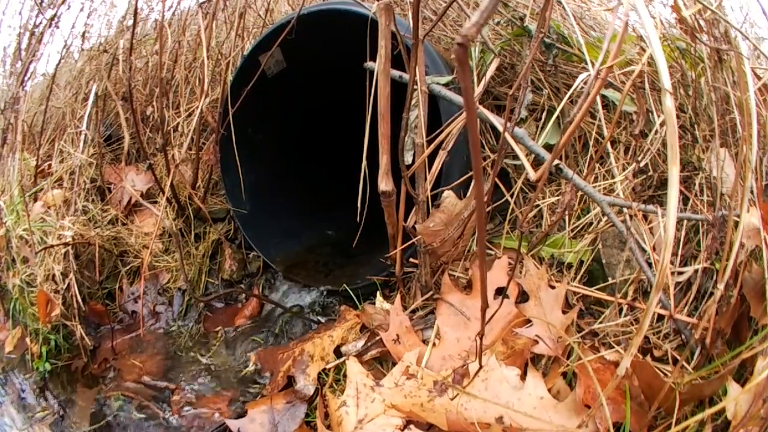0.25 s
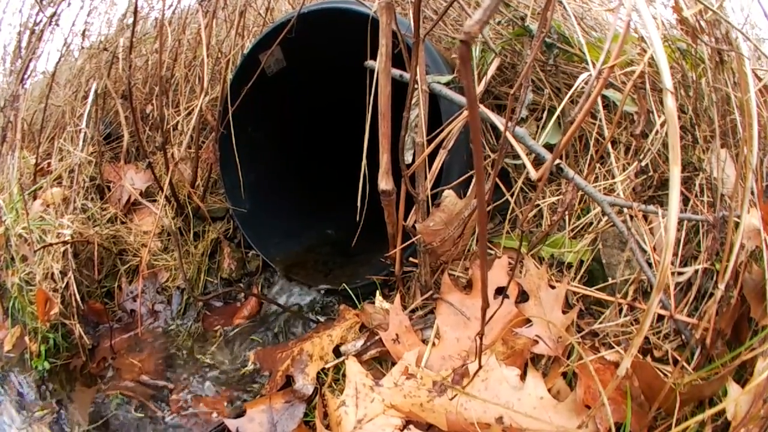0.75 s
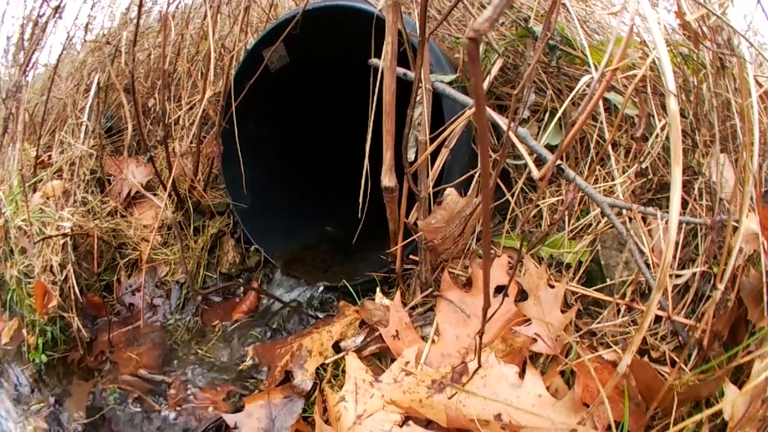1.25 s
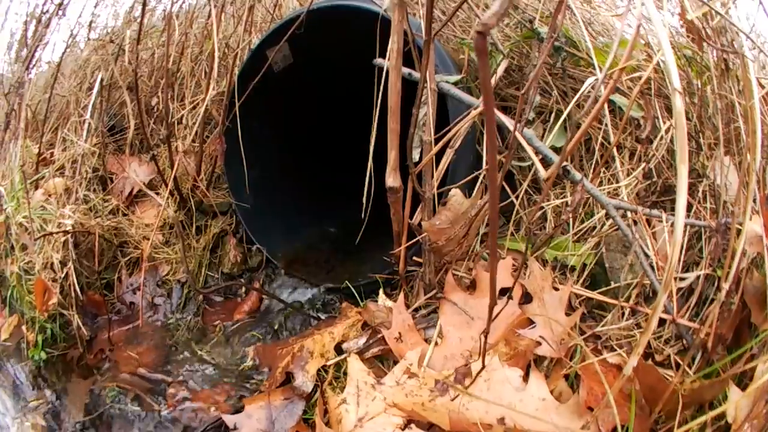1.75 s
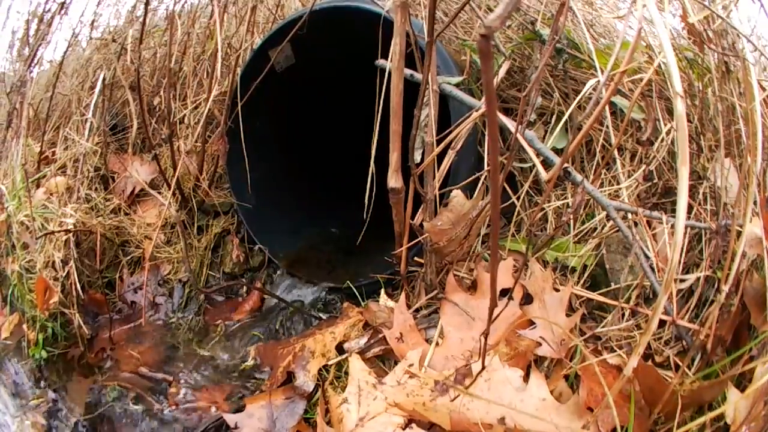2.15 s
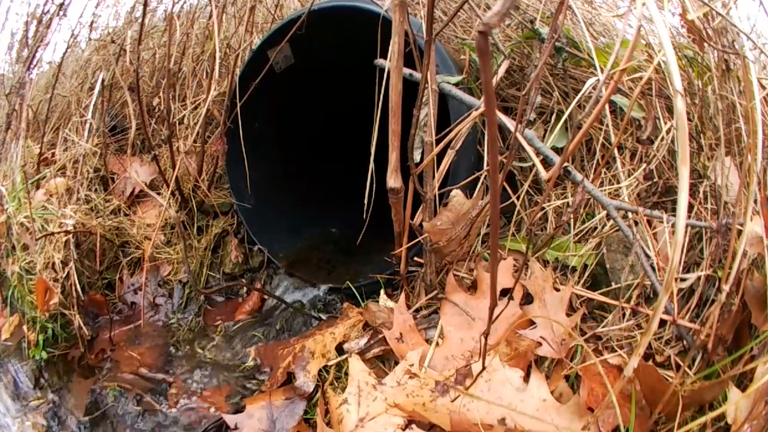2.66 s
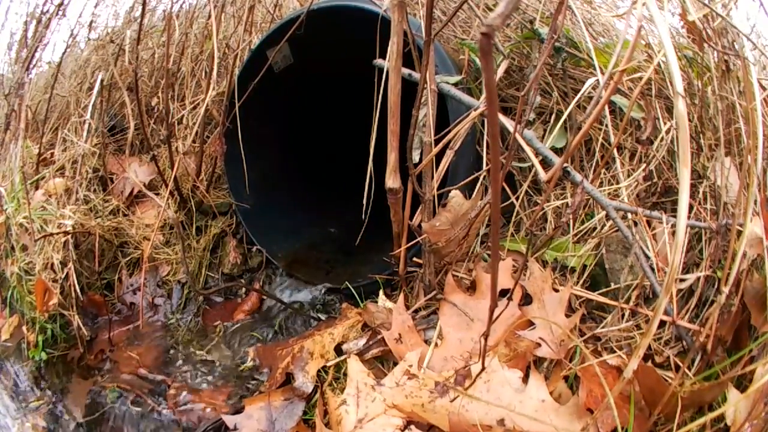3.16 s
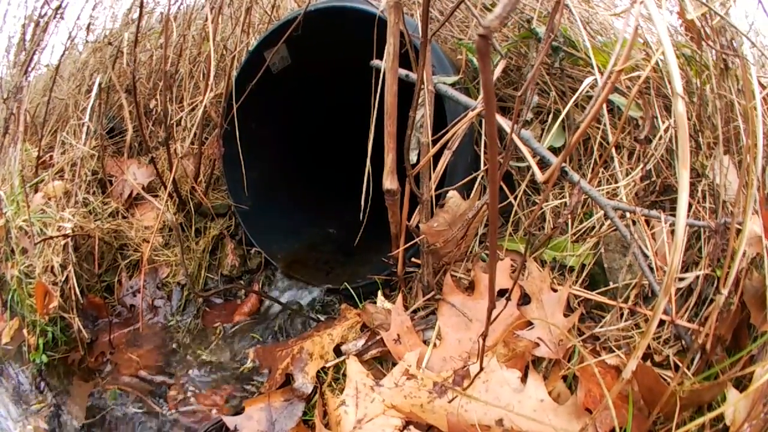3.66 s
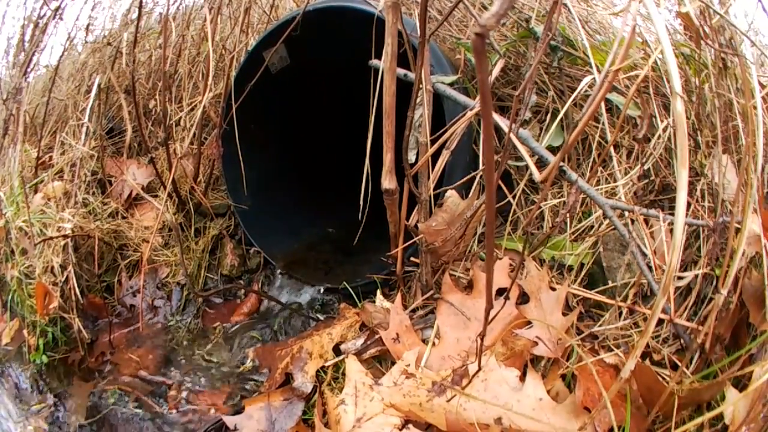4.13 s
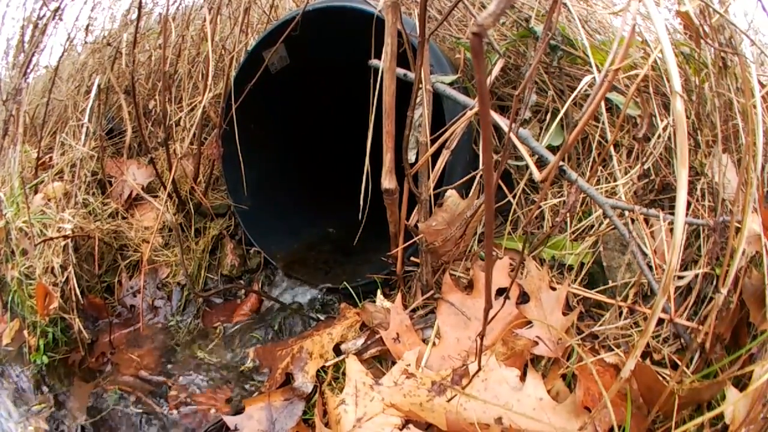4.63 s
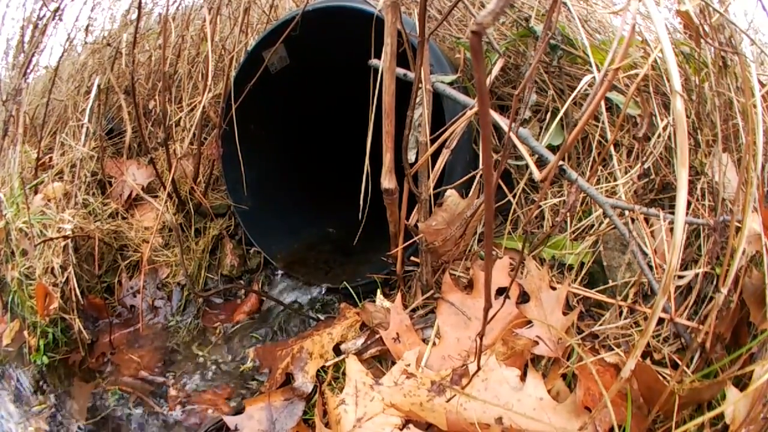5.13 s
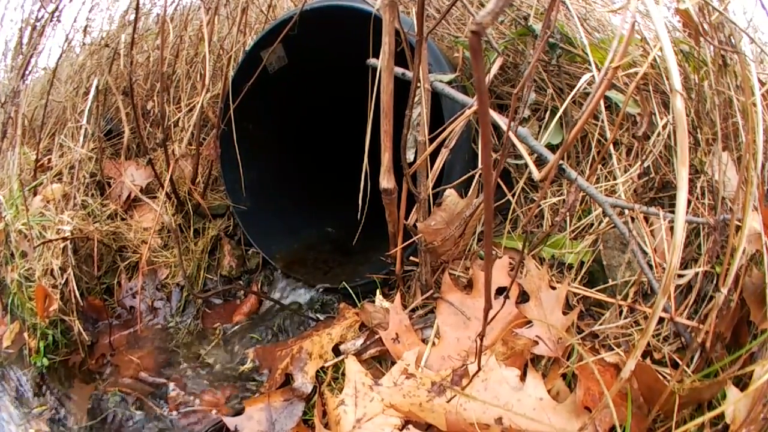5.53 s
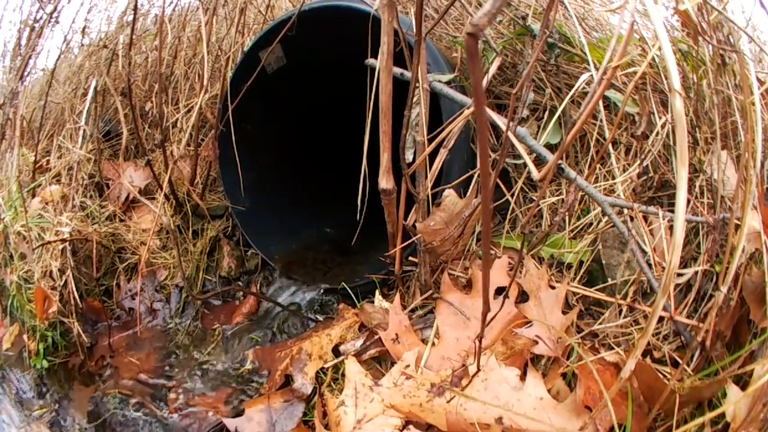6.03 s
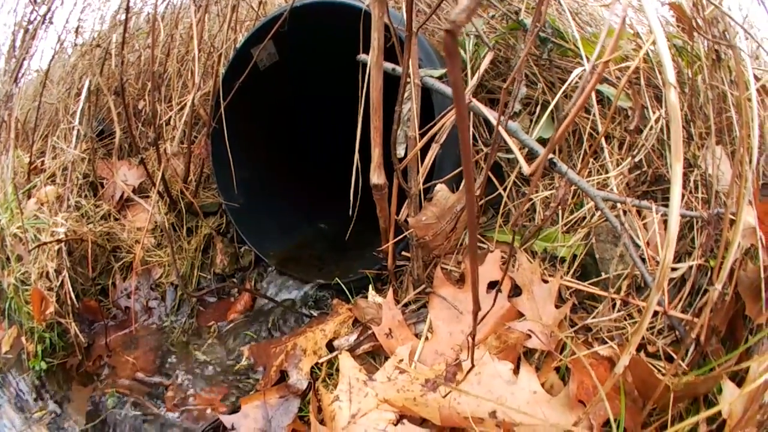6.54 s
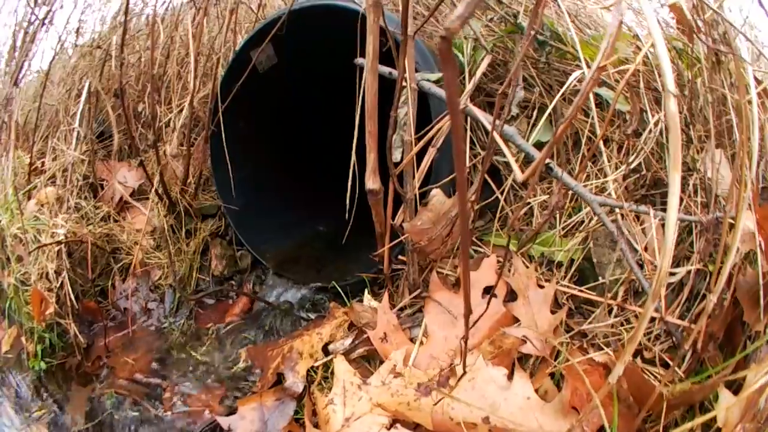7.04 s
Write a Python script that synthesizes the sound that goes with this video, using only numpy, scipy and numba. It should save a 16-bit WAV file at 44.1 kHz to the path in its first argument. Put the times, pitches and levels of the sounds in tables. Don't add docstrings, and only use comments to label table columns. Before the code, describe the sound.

Close, bright water dribbles and gurgles over wet leaves, crisp with tiny bubble pops and spray ticks, leaning left, with a barely audible road rumble.

```python
import sys
import numpy as np
from scipy import signal
from scipy.fft import rfft, irfft, next_fast_len
from scipy.io import wavfile
from scipy.ndimage import uniform_filter1d, map_coordinates
from numba import njit

SR = 44100
rng = np.random.default_rng(int(sys.argv[2]) if len(sys.argv) > 2 else 0)


def log_audio(samples):
    frames = np.atleast_2d(samples).T
    limited = np.clip(frames, -1, 1)
    pcm = np.round(limited * 32767).astype(np.int16)
    wavfile.write(sys.argv[1], SR, pcm)


def undo_db(level):
    steps = np.asarray(level, float) / 20
    return 10 ** steps


N = 321489

# time_s, level_db
FLOW = [
    (0, -46.5),
    (3.6, -46.5),
    (7.29, -45.5),
]
# frequency_hz, density_db
WASH_SPECTRUM = [(300, -45), (480, -80), (720, 9.5), (1240, -5.5), (2500, 2), (4800, 1.5), (6200, 0),
                 (8000, -7.5), (11000, -8), (16000, -3.5)]
# centre_hz, width_hz, depth_db
ECHO_DIPS = [(713, 47, 14), (1950, 79, 12), (2310, 410, 6.5), (3063, 113, 12.5), (3966, 190, 9),
             (5690, 200, 1), (8860, 230, 5.5)]
# low_hz, high_hz, gain_db
THIN_BAND = (7520, 8000, -10)
# frequency_hz, density_db
RUMBLE_SPECTRUM = [(22, -36), (40, -24), (75, 0.5), (110, 5), (170, 3.5), (255, -4.5), (310, -16.5),
                   (450, -19), (620, -8), (800, -15)]
# time_s, rumble_db, tyres_db
ROAD = [(0, -62, -68.5), (.7, -61, -70.5), (1.7, -59, -67.5), (2.6, -63, -70.5), (3.3, -59.5, -72),
        (4, -65.5, -71.5), (4.6, -60.5, -80), (5.4, -63.5, -84), (6, -63.5, -73.5), (6.9, -62, -81),
        (7.29, -62.5, -98)]
# time_s, pitch_hz, level_db
ENGINE = [(0.25, 124, -85), (.35, 126.7, -68), (.55, 127.7, -72), (.84, 129.1, -58), (1.12, 132.2, -64),
          (1.3, 133.2, -72), (1.5, 135, -62), (1.9, 134, -82), (2.12, 137.1, -66), (2.45, 137.9, -64.5),
          (2.9, 141.5, -83)]
# frequency_hz, difference_db
LEFT_LEAN = [(60, 9), (200, 9.3), (380, 5.7), (700, 9.2), (2400, 10.5), (8000, 13.2), (15000, 15.3)]
# frequency_hz, level_db
RIGHT_SHARE = [(40, -6), (130, -17), (300, -5), (640, -13), (3100, -22), (15000, -31)]
# frequency_hz, density_db
TYRE_SPECTRUM = [(120, -17), (200, -3), (290, -6.5), (330, -11.5), (480, -16), (700, -59)]
# frequency_hz, density_db
SPRAY_SPECTRUM = [(1500, -8), (3000, -0.5), (6000, 14), (9000, -5.5), (16500, -5.5)]
# frequency_hz, density_db
MIST_SPECTRUM = [(5000, -24), (8000, 1), (11000, -3), (16500, -1)]

# start_s, level_db, pitch_hz
GLUGS = [(0.041, -36, 940), (0.134, -35.5, 940), (0.205, -40, 1166), (0.235, -38, 799),
         (0.453, -37.5, 1209), (0.524, -36.5, 1167), (0.96, -41, 1300), (1.097, -39, 963),
         (1.304, -37.5, 1145), (1.495, -38, 1053), (1.547, -42, 866), (1.679, -37.5, 1190),
         (2.408, -39, 1210), (2.486, -43.5, 819), (2.754, -34.5, 1060), (3.249, -39, 770),
         (3.923, -33.5, 923), (4.028, -38.5, 759.4), (4.45, -38, 1225), (4.467, -37.5, 1062),
         (4.539, -38.5, 1297), (4.568, -39, 997), (4.716, -44.5, 821), (5.241, -41, 1095),
         (5.946, -40, 1097), (6.258, -39.5, 987), (6.407, -38, 1006), (6.598, -39, 1070),
         (6.641, -34, 1053), (7.186, -31.5, 1000)]
BLOOPS = [(0.1008, -33, 1314), (0.799, -39, 1315), (1.1468, -36, 1373), (1.365, -35.5, 1434),
          (1.711, -32.5, 1181), (1.82, -34, 1247), (2.9682, -30, 1300), (3.473, -35.5, 1440),
          (3.6575, -38.5, 1485), (3.6791, -36, 1224), (3.7826, -32, 1470), (3.8601, -35, 1300),
          (4.229, -41, 1171), (4.2693, -33.5, 1483), (4.499, -41, 1336), (5.0346, -35.5, 1345),
          (5.2799, -40.5, 1146), (5.3348, -39, 1488), (5.575, -35.5, 1170), (5.752, -33, 1500),
          (5.783, -35, 1300), (6.2069, -35, 1495), (6.4755, -33, 1516), (6.5228, -35, 1415),
          (6.8465, -28.5, 1197), (6.9556, -38, 1350), (7.0256, -32, 1377)]
PLOPS = [(0.0296, -37.5, 1823), (0.343, -33, 2044), (0.388, -34.5, 1716), (0.891, -34.5, 1768),
         (1.079, -37, 1790), (1.2007, -34, 1750), (1.3441, -32.5, 1830), (1.8274, -36, 1732),
         (2.1862, -37.5, 1700), (2.3238, -37, 1695), (2.497, -39, 1785), (2.503, -32, 1770),
         (2.518, -31.5, 1950), (3.1011, -35, 1670), (3.2258, -37, 1730), (3.8455, -31.5, 1870),
         (4.0619, -37, 1760), (4.134, -33, 1670), (5.0393, -32, 1670), (5.288, -37.5, 1760),
         (5.3371, -33, 1830), (5.6453, -39.5, 1667), (5.8366, -33.5, 1745), (6.0837, -27, 1768),
         (6.1473, -33.5, 1778), (6.2416, -35, 1840), (6.2535, -31.5, 1670), (6.3681, -27, 1840),
         (6.8459, -34.5, 1829)]
PLINKS = [(0.213, -38, 2290), (0.377, -40, 2200), (0.477, -36, 1987), (0.6329, -35, 5810),
          (0.6359, -35, 7200), (0.663, -41, 7210), (1.971, -36, 2650), (2.007, -32, 2960),
          (2.048, -33, 3390), (2.0695, -34, 2700), (2.1, -39, 3495), (0.8285, -23, 2725),
          (0.891, -31, 2607), (0.989, -26.5, 2637), (1.037, -24, 2740), (1.067, -27, 3565),
          (2.322, -27, 3395), (2.5326, -28, 3460), (2.9474, -24, 3400), (3.134, -25, 3572),
          (3.4833, -25.5, 2956), (3.5565, -29.5, 2299), (3.7454, -23.5, 3217), (4.5455, -26, 2802),
          (4.5565, -27, 3426), (4.5731, -22, 3300), (4.6731, -27.5, 2760), (4.7173, -29.5, 3350),
          (4.978, -26.5, 3379), (5.004, -30, 2543), (5.0402, -26, 3320), (5.166, -22, 3863),
          (5.3573, -24.5, 2968), (5.4029, -27, 2750), (5.4914, -32.5, 2670), (5.7113, -27, 3112),
          (6.2481, -26, 2363), (6.473, -25, 2740), (6.5208, -24, 3470)]
TICKS = [(0.0347, -21, 4730), (0.495, -25.5, 5053), (0.5488, -27.5, 4780), (0.6861, -23.5, 4330),
         (0.7067, -24.5, 4631), (1.3095, -25.5, 4903), (1.374, -26, 4222), (1.956, -20.5, 4787),
         (2.0385, -25.5, 4643), (2.385, -31, 5027), (2.6709, -30, 4023), (2.97, -27, 4662),
         (3.0963, -24, 4340), (3.272, -24.5, 4840), (3.7526, -27.5, 4940), (3.9762, -26, 4900),
         (4.1342, -28, 4280), (4.482, -32, 4196), (4.7592, -26, 5160), (4.811, -25.5, 5194),
         (4.9254, -25, 4160), (5.039, -27, 4774), (5.26, -31, 4338), (5.473, -22.5, 4680),
         (6.299, -20.5, 4930), (6.53, -26, 4154), (6.6498, -26, 4920), (6.87, -26.5, 5000),
         (7.139, -26, 4700)]
PIPS = [(0.4613, -25, 6260), (1.123, -24.5, 6660), (1.2854, -25.5, 5898), (1.356, -27, 5690),
        (1.5214, -30.5, 6300), (1.6196, -26, 5970), (2.0338, -24.5, 6937), (2.052, -32, 5893),
        (2.355, -27.5, 7040), (2.4196, -28, 6793), (2.6504, -28.5, 6100), (2.687, -25, 7328),
        (2.995, -26.5, 5700), (3.5539, -43, 6103), (3.7557, -26, 6186), (3.9792, -21, 5600),
        (4.372, -29.5, 6100), (4.672, -21.5, 6850), (5.7285, -27, 5987), (5.781, -23, 6460),
        (5.8904, -26, 7013), (5.996, -27.5, 5850), (6.1085, -27, 6137), (6.2164, -32, 5793),
        (6.6147, -25.5, 6260), (6.9697, -29, 6360), (7.1589, -27.5, 7000), (7.255, -20.5, 6800)]
SPITS = [(0.5915, -31, 10520), (0.654, -16, 14000), (0.6853, -28, 10720), (0.8672, -17.5, 13080),
         (1.0987, -22, 13800), (1.5482, -37, 11710), (1.5793, -22, 11800), (1.9021, -27, 14350),
         (2.418, -21.5, 15240), (2.4582, -22.5, 9670), (2.688, -20, 12620), (3.034, -22.5, 13000),
         (3.19, -31, 9856), (3.539, -20, 10870), (4.3319, -24, 9730), (4.356, -19, 14400),
         (4.4119, -24.5, 10780), (4.6183, -22, 12200), (4.836, -22, 12120), (4.847, -27, 15100),
         (5.689, -24, 9456), (6.2208, -27, 13890), (6.2974, -22, 12600), (6.4077, -24.5, 9240),
         (6.427, -28, 10160), (6.465, -24, 14900), (7.036, -27, 10010), (7.06, -16, 10390),
         (7.1557, -29.5, 9740)]
# start_s, level_db, pitch_hz
POPS = [(0.1757, -26.5, 4260), (0.427, -25, 4740), (0.771, -20, 5000), (1.6372, -27, 3252),
        (1.702, -21, 5430), (1.7485, -24, 3300), (1.7582, -30, 4740), (2.2944, -29, 5533),
        (2.602, -23, 2400), (2.7316, -20, 5025), (2.8745, -22.5, 2900), (3.1746, -23, 2680),
        (3.2233, -26, 5426), (3.5734, -20, 6120), (3.6928, -26.5, 2830), (3.7167, -26, 4870),
        (3.99, -25.5, 2963), (4.0236, -24, 4870), (4.132, -22.5, 4248), (4.4029, -26.5, 5960),
        (4.8783, -27, 5900), (5.0313, -24, 2720), (5.4209, -20, 6060), (5.6447, -24, 3335),
        (5.8377, -27, 4520), (6.1803, -25, 3597), (6.9292, -24, 3885), (6.9664, -23, 2648)]
# start_s, level_db, pitch_hz
BURBLES = [(0.0732, -41, 1330), (0.1095, -45, 1740), (0.1828, -41.5, 1010), (0.2606, -40.5, 1830),
           (0.6637, -44, 1830), (0.703, -40, 1778), (0.7427, -39, 1130), (0.888, -34, 2210),
           (0.9702, -36.5, 1300), (1.1088, -39, 1680), (1.167, -45, 1205), (1.2164, -43, 1075),
           (1.2845, -41, 1350), (1.413, -36.5, 1831), (1.6784, -41, 1639), (2.0021, -39, 1620),
           (2.1589, -39, 1747), (2.2255, -40, 1369), (2.5345, -38, 1437), (2.6387, -38, 2050),
           (2.6958, -41, 1508), (3.2546, -40, 1462), (3.5385, -47, 1250), (3.6158, -36, 1990),
           (3.6934, -43, 1430), (3.8244, -35, 1770), (3.925, -43, 1455), (4.1144, -36.5, 1499),
           (4.1332, -40.5, 1154), (4.3317, -42.5, 1451), (4.3673, -35, 2080), (4.5691, -41, 1400),
           (4.5843, -41, 1690), (4.9215, -47, 1290.0), (4.9627, -42, 1880), (4.9959, -41, 1125),
           (5.032, -45, 870), (5.1916, -40.5, 1504), (5.2966, -40.5, 1414), (5.3536, -37, 2110.0),
           (5.375, -40, 1770), (5.5784, -44, 1660), (5.713, -42.5, 949), (5.7157, -37, 1570),
           (5.7972, -39, 1220), (6.0109, -41, 1348), (6.104, -31, 2110.0), (6.2205, -45, 1389),
           (6.629, -42, 1370), (6.722, -41, 1100), (6.7693, -43, 1820), (6.8926, -42, 1690),
           (7.1474, -41, 1474), (7.1597, -43, 1393), (7.2117, -32, 1900)]
# start_s, level_db, pitch_hz
TINKLES = [(0.0713, -26, 4700), (0.2016, -29.5, 4745), (0.398, -34, 3377), (0.4233, -31.5, 3800),
           (0.5517, -27.5, 2570), (0.739, -29, 4870.0), (0.7743, -29, 5230), (0.846, -29.5, 4830),
           (1.0032, -25.5, 4803), (1.2497, -29, 5295), (1.638, -32, 4977), (1.75, -31, 4993),
           (2.0449, -32, 4940), (2.1223, -31.5, 3500), (2.1427, -32.5, 3750), (2.6087, -37, 2641),
           (2.6338, -32, 2709), (2.6386, -32, 6720.0), (2.801, -32, 3410), (3.1744, -33, 5567),
           (3.2226, -31, 3440), (3.2316, -29.5, 4935), (3.3466, -30, 2753), (3.4911, -37, 5164),
           (3.506, -33, 4522), (3.5399, -25.5, 7130), (3.7133, -32, 3300), (3.7578, -31, 5004),
           (3.9399, -30.5, 5475), (3.9897, -29, 4944), (4.171, -25.5, 3331), (4.7191, -36, 4750),
           (4.793, -27.5, 3823), (4.8613, -25.5, 3121), (4.9177, -31, 4900), (5.031, -33, 4843),
           (5.1227, -29, 5030), (5.1859, -31, 2877), (5.2395, -30, 5137), (5.3334, -30, 5310),
           (5.4993, -26.5, 4915), (5.6928, -28, 3390), (5.7128, -31, 4910), (5.83, -28.5, 3265),
           (6.1813, -34, 6420.0), (6.2487, -29, 6030.0), (6.455, -30, 2660), (6.5651, -29.5, 4217),
           (6.6203, -33, 3364), (6.694, -32, 2668), (7.0598, -27.5, 3074), (0.0103, -30, 4800),
           (0.051, -28, 3065), (1.961, -29, 4400), (2.575, -34, 2755), (2.6258, -27, 5340),
           (3.8603, -31.5, 3840), (3.957, -34, 3102), (4.638, -29, 4980), (5.358, -23.5, 3900),
           (5.88, -37, 2897)]
# start_s, level_db, pitch_hz
FLICKS = [(0.3222, -29, 9890), (0.639, -23, 12190), (0.6925, -24, 14380.0), (0.9913, -26, 11220),
          (1.0389, -26, 9690.0), (1.0621, -29, 11440), (1.123, -29, 14940.0), (1.29, -30, 9726),
          (1.4616, -30, 8356), (1.5473, -27, 13690), (1.8834, -27, 10000), (2.0952, -37, 15070.0),
          (2.4435, -26, 14130.0), (2.693, -27, 11560), (2.97, -29, 13490), (3.0094, -32, 8195),
          (3.196, -34.5, 9693), (3.483, -25.5, 9430.0), (3.58, -19.5, 8000), (3.678, -28, 9295),
          (4.3234, -39, 9550), (4.6764, -33, 12180), (4.8308, -29, 9296), (5.005, -27.5, 9200),
          (5.1071, -27, 9315), (5.171, -30, 9390), (5.2294, -28, 9530), (5.8792, -36.0, 15470),
          (5.8894, -22, 10160.0), (6.2957, -25, 15200.0), (6.6943, -32, 8350), (6.7607, -31, 8176),
          (7.0282, -22, 11260), (7.0706, -25, 10900), (7.1544, -24, 14600.0)]
# start_s, level_db, pitch_hz
GULPS = [
    (1.635, -46, 440),
    (1.735, -45, 396.7),
]
# start_s, level_db, first_pitch_hz
SWEEPS = [
    (0.949, -33, 2400),
    (1.0127, -31, 2794),
    (1.933, -30, 1630),
    (3.699, -40, 2610),
    (6.601, -27.5, 3670),
]
# pitch_hz, cycles_to_fade
RING_CYCLES = [(400, 6.8), (900, 13), (1250, 19), (1750, 27.2), (3000, 15.3), (5000, 21.3), (12000, 9.8)]

POP_CYCLES, SWELL_S = 5, 0.00007
SPECK_HZ = 8000
TOP_HZ = 16120


def unit(x):
    return x / np.sqrt(np.mean(x ** 2) + 1e-20)


def along(points, hz):
    f, v = np.transpose(points)
    return np.interp(np.log(hz + 1), np.log(f + 1), v)


def curves(rows):
    s, *cols = np.transpose(rows)
    return [np.interp(np.arange(N) / SR, s, c) for c in cols]


def wobble(rate):
    knots = rng.standard_normal(int(N * rate / SR) + 4)
    return map_coordinates(knots, [np.arange(N) * rate / SR])


def filtered(x, response):
    m = next_fast_len(N + 8192)
    return irfft(rfft(x, m) * response(np.fft.rfftfreq(m, 1 / SR)), m)[..., :N]


def noise(spectrum, patchy_db=0):
    z = signal.stft(rng.standard_normal(N + 2048), nperseg=2048)[2]
    field = uniform_filter1d(rng.standard_normal(z.shape), size=3, axis=0)
    field = uniform_filter1d(field, size=9, axis=1)
    patchy = signal.istft(z * undo_db(patchy_db * unit(field)), nperseg=2048)[1][:N]
    return unit(filtered(patchy, lambda hz: undo_db(along(spectrum, hz))))


@njit
def add(out, s, gain, hz, cycles, rise, attack, hold, sr):
    for i in range(len(s)):
        start, life = int(s[i] * sr), cycles[i] / hz[i]
        for k in range(min(int(2 * life * sr), len(out) - start)):
            t = k / sr
            climb = rise[i] * t * t / (life * life)
            turns = hz[i] * t * (1 + climb / 3)
            if hz[i] * (1 + climb) < sr / 2:
                fade = np.exp(-3 * (t / life) ** hold[i])
                swell = 1 - np.exp(-t * hz[i] / attack[i])
                out[start + k] += gain[i] * np.sin(2 * np.pi * turns) * fade * swell


def ring(s, db, hz, cycles, rise, attack, hold):
    out, luck = np.zeros(N), rng.standard_normal((len(s), 4))
    cycles = cycles * np.exp(0.27 * luck[:, 0])
    glide = rise * (1 + 1.19 * luck[:, 1])
    attack = attack * np.exp(0.41 * luck[:, 2])
    hold = hold * np.exp(0.21 * luck[:, 3])
    add(out, s, undo_db(db), hz * (1 - rise / 9), cycles, glide, attack, hold, float(SR))
    return out


def splashes(s, db, spectrum, t60):
    starts = np.bincount((s * SR).astype(int), undo_db(2 * db), N)[:N]
    t = np.arange(SR // 50) / SR
    burst = undo_db(-120 * t / t60) * (1 - np.exp(-t / 0.00022))
    power = signal.fftconvolve(starts, burst)[:N]
    return np.sqrt(np.abs(power)) * noise(spectrum)


def clearest():
    lasting = GULPS + BURBLES + TINKLES + FLICKS + GLUGS + BLOOPS + PLOPS + PLINKS + TICKS + PIPS + SPITS
    s, db, hz = np.transpose(lasting + POPS)
    bursts = np.arange(len(s)) >= len(s) - len(POPS)
    cycles = np.where(bursts, POP_CYCLES, along(RING_CYCLES, hz))
    return np.array([s + .0005, db - .4 + 1.9 * bursts, hz, cycles])


def impacts(count):
    pace = (np.arange(count) + .9 * rng.random(count)) * (N - 1) // count
    heavy = clearest()[0] * SR
    known = np.bincount(heavy.astype(int), minlength=N)[:N]
    near = uniform_filter1d(1. * known, size=700, origin=-250) > 0
    drops = np.bincount(pace.astype(int), undo_db(4 * rng.standard_normal(count)), N)
    drops = drops * np.where(near, .15, 1)
    t = np.arange(SR // 30) / SR
    births = signal.fftconvolve(drops + .8 * known, t * np.exp(-t / .0025))
    births = np.abs(births[70:N + 70])
    return births / births.mean()


def scatter(bunching, size_db, count):
    chance = np.cumsum(bunching)
    luck = rng.random((count, 2))
    s = np.searchsorted(chance, luck[:, 0] * chance[-1]) / SR
    return s, np.minimum(-size_db * np.log(1 - luck[:, 1]), 1.9 * size_db)


def swarm(bunching, hz, spread, cycles, rise, size_db, attack, count):
    s, db = scatter(bunching, size_db, count)
    pitch = np.minimum(hz * np.exp(spread * rng.standard_normal(count)), 16000)
    pitch = np.maximum(pitch, 870 ** 2 / pitch)
    return unit(ring(s, db, pitch, cycles, rise, max(attack, .02), hold=0.87))


def small_water(births):
    flow_db, = curves(FLOW)
    gurgle = swarm(.6 + births, hz=1300, spread=0.2977, cycles=23.0, rise=0.255,
                   size_db=5.0, attack=0.059, count=2000)
    fizz = swarm(0.35 + births, hz=4447, spread=0.423, cycles=12.6, rise=0.13,
                 size_db=7.0, attack=0.84, count=6500)
    mist = swarm(0.3 + births, hz=13000, spread=0.25, cycles=7.1, rise=0.03,
                 size_db=8.5, attack=0.6, count=4500)
    spray = unit(splashes(*scatter(.1 + births, size_db=7.5, count=2200), SPRAY_SPECTRUM, t60=0.0013))
    wash = noise(WASH_SPECTRUM, patchy_db=6.0) * undo_db(0.91 * wobble(45))
    bubbles = undo_db(-8.5) * gurgle + undo_db(-0.75) * fizz + undo_db(-7) * mist
    return undo_db(flow_db) * (bubbles + undo_db(-9.0) * spray + undo_db(-12.0) * wash)


def traffic():
    rumble_db, tyres_db = curves(ROAD)
    rumble = undo_db(rumble_db) * noise(RUMBLE_SPECTRUM, patchy_db=3.5)
    tyres = undo_db(tyres_db) * noise(TYRE_SPECTRUM, patchy_db=4.0)
    hz, db = curves(ENGINE)
    turns = np.cumsum(hz + 0.29 * wobble(12.1)) / SR
    hum = undo_db(db + 2.0 + 0.89 * wobble(8.3)) * np.sin(2 * np.pi * turns)
    return rumble + tyres + hum


def neck_snaps(s, hz, spit_db):
    snap_hz = 5500 * np.exp(0.23 * rng.standard_normal(len(s)))
    snap_db = spit_db + 1.5 - 4 * np.log2(hz / 2500)
    snaps = ring(s - .0003, snap_db, snap_hz, 1.5, 0, 0.22, hold=0.89)
    return filtered(snaps, lambda f: (1j * f / (1600 + 1j * f)) ** 2)


def clear_bubbles():
    s, db, hz, cycles = clearest()
    glide, swell = 0.05 + 0.06 * (1000 / hz), 0.12 + SWELL_S * hz
    out = ring(s, db + 2.5, hz, .9 * cycles, glide, swell, hold=0.82 + 800 / hz)
    spit_db = db + 0.77 * np.log2(hz / 4000) + rng.uniform(-4, 4, len(s))
    speck = hz > SPECK_HZ
    large = ~speck
    out = out + neck_snaps(s[large], hz[large], spit_db[large])
    out = out + splashes(s[large] - .0006, spit_db[large] - 5, SPRAY_SPECTRUM, t60=0.0066)
    return out + splashes(s[speck] - .0003, spit_db[speck] - 5.5, MIST_SPECTRUM, t60=0.0053)


def sweeps():
    s, db, hz = np.transpose(SWEEPS)
    out, same = np.zeros(N), np.ones(len(s))
    add(out, s, undo_db(db), hz, 30 * same, 1.5 * same, 1.6 * same, 2.7 * same, float(SR))
    return out


def hollow(x):
    t = np.arange(SR // 20) / SR
    tail = rng.standard_normal(len(t)) * undo_db(-60 * t / 0.043) * (t > .0006)
    return signal.fftconvolve(x, tail / np.linalg.norm(tail))[:N]


def mouth(f):
    gain = (1j * f / (480 + 1j * f)) ** 3
    for hz, width, db in ECHO_DIPS:
        off_centre = hz * hz - f * f
        gain = gain * (off_centre + 1j * f * width * undo_db(-db)) / (off_centre + 1j * f * width)
    return gain


def scene():
    births = impacts(count=420)
    water = small_water(births) + clear_bubbles() + sweeps()
    water = filtered(water + undo_db(-18.5) * hollow(water), mouth)
    left = water + traffic()
    other = filtered(hollow(water) + traffic(), lambda hz: undo_db(along(RIGHT_SHARE, hz)))
    right = filtered(left + other, lambda hz: undo_db(-along(LEFT_LEAN, hz)))
    return undo_db(4.0) * np.array([left, right])


def roll_off(x):
    return signal.sosfilt(signal.butter(12, 17310, fs=SR, output="sos"), x)


def record(dry):
    low, high, gap_db = THIN_BAND
    kept = filtered(dry, lambda hz: np.where((hz > low) & (hz < high), undo_db(gap_db), 1) * (hz < TOP_HZ))
    top = filtered(dry, lambda hz: (hz > TOP_HZ) * undo_db(-10 - (hz - TOP_HZ) / 95) * (hz < 18050))
    power = np.abs(uniform_filter1d(top[0] ** 2, size=512))
    sharp = uniform_filter1d(1. * (power > 4.5 * power.mean()), size=256)
    return roll_off(kept + top * sharp)


dry = scene()
out = record(dry)
log_audio(out)
```